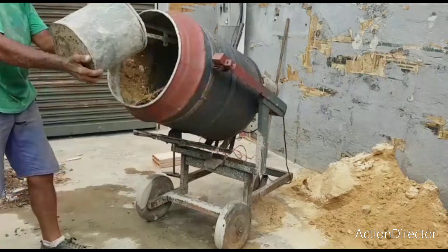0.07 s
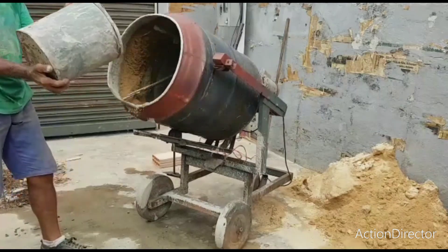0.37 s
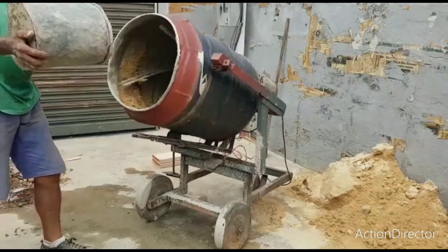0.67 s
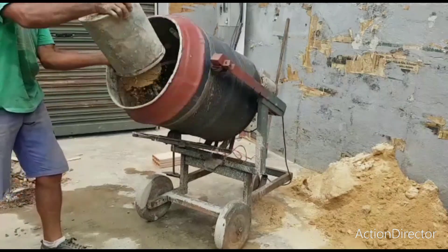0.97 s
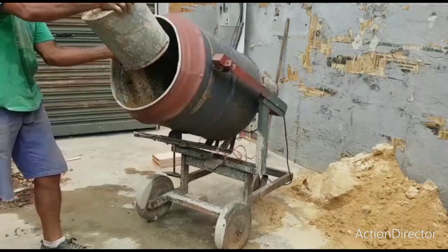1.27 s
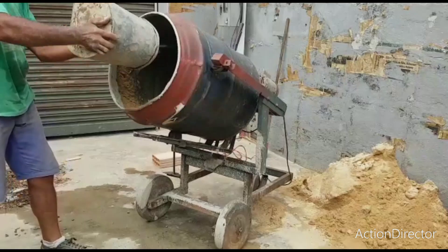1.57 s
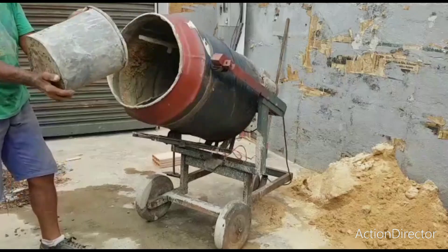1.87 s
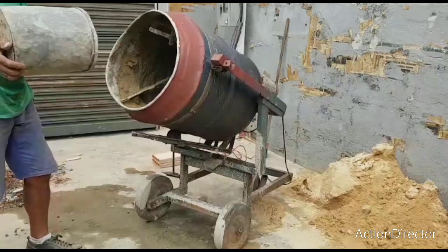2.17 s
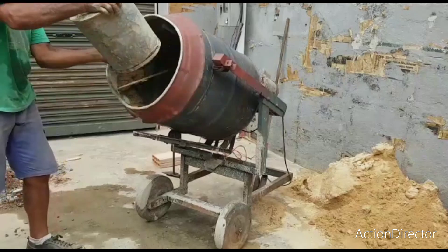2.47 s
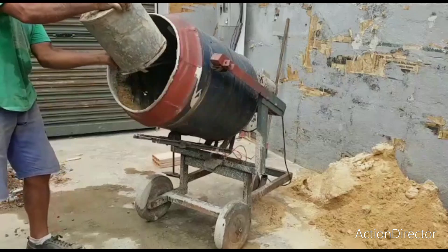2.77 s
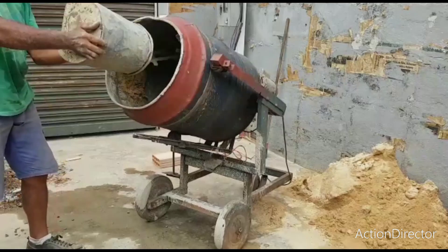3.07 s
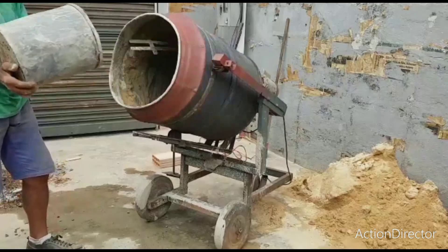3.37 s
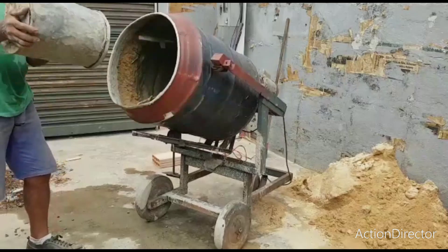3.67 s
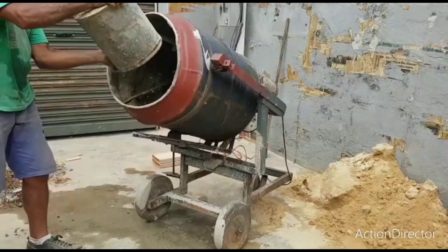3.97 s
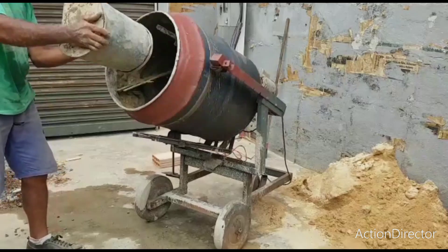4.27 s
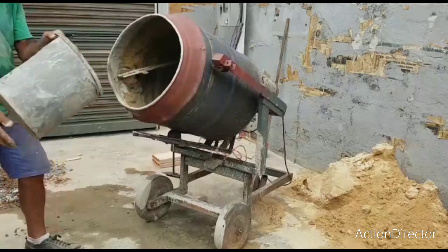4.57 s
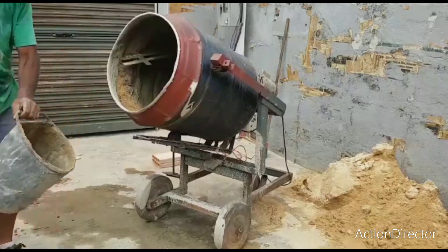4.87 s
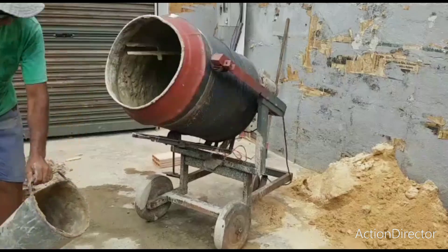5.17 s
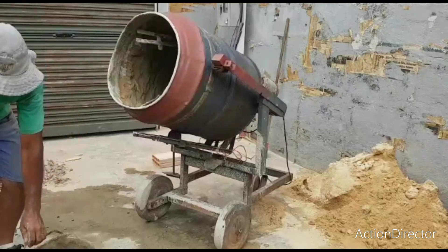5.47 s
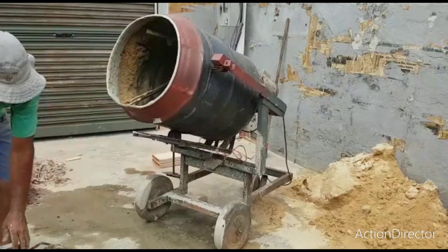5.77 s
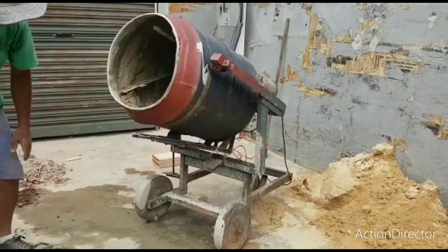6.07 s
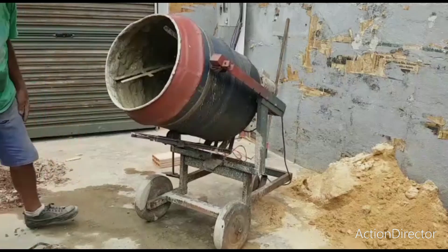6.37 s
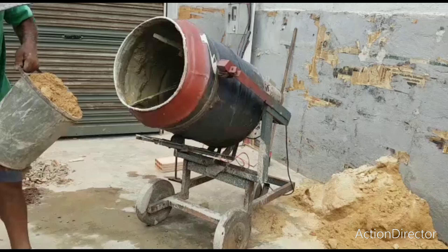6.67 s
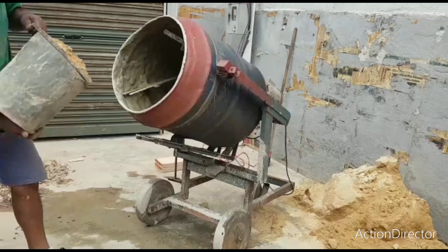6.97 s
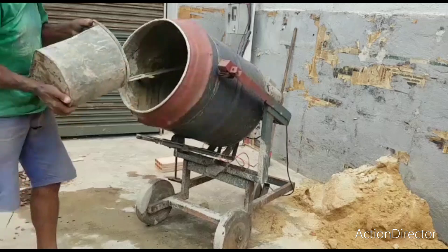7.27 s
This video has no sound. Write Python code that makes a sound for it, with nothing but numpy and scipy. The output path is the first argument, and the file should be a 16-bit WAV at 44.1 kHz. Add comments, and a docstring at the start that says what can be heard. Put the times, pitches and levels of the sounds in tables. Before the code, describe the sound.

A small electric concrete mixer hums and rumbles outdoors, rattling about once a second as sand slides inside and a bucket knocks against it.

```python
"""A small electric concrete mixer turns in a yard, its load swelling once a turn, about every second.
From the start the motor's hum beats against the booms of lumps slumping in the steel drum; the ring
gear rattles, damp sand slides and dry spots squeak by stick-slip friction. Near 1 s a plastic bucket
is knocked empty and the rim gives the first of its clanks. A far engine murmurs, loudest near 3 s.
Near 5.8 s the bucket is dropped on the ground, and at 6.75 s the sound stops abruptly."""
import sys
import numpy as np
from scipy import signal
from scipy.fft import rfft, irfft, next_fast_len
from scipy.io import wavfile
from scipy.ndimage import uniform_filter1d, map_coordinates

SR = 44100
rng = np.random.default_rng(int(sys.argv[2]) if len(sys.argv) > 2 else 0)


def waveform_to_disk(signal):
    """Save audio, clipped to [-1, 1], as 16-bit WAV at the path in sys.argv[1]."""
    frames = np.transpose(np.atleast_2d(signal))
    scaled = np.clip(frames, -1, 1) * 32767
    samples = np.round(scaled).astype(np.int16)
    wavfile.write(sys.argv[1], SR, samples)


N = 322812

# turns of the drum: (start t/s, deepest mode gain/dB, hum gain/dB, sand gain/dB, jolt level/dB)
DRUM_TURNS = [(-.223, 4, 0.5, -3, -26), (0.849, 0.5, -1, -0.6, -26.5), (1.929, 0.5, 1.5, -1.2, -24),
              (3.0, 1, -1, 0, -30), (4.078, 1.5, 1, -1.5, -22.5), (5.146, -1.5, 2, 1.5, -35),
              (6.215, 0, 0.5, -1, -25.5)]
# the motor's hum as it labours: (t/s into the turn, level/dB)
MOTOR_HUM = [(0, -26), (.08, -28.5), (.22, -34), (.35, -27.5), (.55, -31.5), (.79, -36.5), (.87, -35),
             (.98, -37), (1.07, -35)]
# the drum's deepest mode, strongest after the load drops: (t/s into the turn, level/dB)
DEEP_MODE = [(0, -32), (.05, -33), (.14, -27.5), (.25, -28.5), (.35, -40.5), (.47, -41), (.78, -37),
             (.9, -41.5), (1.05, -44)]
# heavy lumps slump and boom the drum: (peak t/s, level/dB, half length/s)
LUMP_SLUMPS = [(.068, -21, 0.051), (0.13, -25, 0.023), (0.643, -26, 0.038), (0.904, -27.5, .04),
               (.992, -20.5, 0.012), (1.078, -17, 0.032), (1.428, -23, 0.042), (1.974, -23, 0.026),
               (2.061, -26, .02), (2.24, -20.5, 0.084), (2.497, -28, 0.027), (2.854, -25, 0.063),
               (3.148, -25, 0.033), (3.276, -26, .024), (3.334, -17.5, 0.047), (3.824, -26.5, 0.041),
               (4.106, -22.5, 0.033), (4.234, -24, 0.033), (4.328, -22, 0.034), (4.418, -21.5, 0.06),
               (4.597, -20.5, 0.045), (4.674, -24, 0.057), (4.943, -27, 0.065), (5.198, -27, 0.035),
               (5.381, -18.5, 0.04), (5.462, -20.5, 0.026), (5.983, -22.5, 0.05), (6.232, -24.5, 0.024),
               (6.316, -25, .02), (6.402, -25, 0.034), (6.473, -23, 0.043), (6.57, -24.5, .027),
               (6.628, -25, .024)]
# higher, weaker modes of the loaded drum: (f/Hz, bandwidth/Hz, level/dB)
DRUM_MODES = [(99.6, 5.5, -1.5), (109.8, 7, -3), (128.9, 2.5, -1.5), (138.2, 2.1, -6.5), (167, 30, -15.5)]

def motor_and_drum(rattle_db):
    """Beating: hum at twice the mains frequency interferes with the drum's deep mode and booms."""
    t = np.arange(N) / SR
    mains_hz = 60 + .08 * wobble(3)
    hum_db = through_turn(MOTOR_HUM, gain_column=2)
    hum = amp(hum_db + 1.1 * wobble(5.4)) * tone(2 * mains_hz)
    hum_cycles = np.cumsum(2 * mains_hz) / SR
    deep_db = through_turn(DEEP_MODE, gain_column=1)
    deep = amp(deep_db - 1 + 1.1 * wobble(5.8)) * tone(hz=88.3 + 1.257 * wobble(8.8))
    booms = np.zeros(N)
    for s, db, length in LUMP_SLUMPS:
        near = slice(*np.searchsorted(t, [s - 4 * length, s + 4 * length]))
        age = t[near] - s
        boom_hz = rng.normal(103.4, 1.1)
        # at its loudest a boom is in phase with the hum; before and after, the two cancel and chug
        cycles = np.interp(s, t, hum_cycles) + boom_hz * age
        booms[near] += amp(db) * np.exp(-(age / length) ** 2) * np.sqrt(2) * np.sin(2 * np.pi * cycles)
    tumbling = resonate(rng.standard_normal((2, N)), DRUM_MODES)
    tumbling = coloured(tumbling, [(55, -26.5), (85, -10.5), (100, 6.5), (170, -4), (300, -7.5)])
    mid, side = steady(tumbling, seconds=.3)
    rumble_db = -34.5 + .73 * (rattle_db - rattle_db.mean())  # swells with the rattle
    rumble = amp(rumble_db) * (mid + amp(-15.5) * np.array([side, -side]))
    shaft = amp(-60) * tone(mains_hz / 2)
    return (hum + deep + booms + rumble) * amp([[-.35], [.35]]) + shaft


# the load drops and the blades lift it: (t/s into the turn, hold/s, rattle level/dB, sand level/dB)
LOAD_SURGES = [(0.01, 0.016, -33, -46), (0.107, 0.032, -35, -49), (0.163, 0.11, -39, -48.5),
               (0.246, .02, -47.5, -67), (0.313, 0.26, -44, -63), (0.4, .02, -50.5, -55),
               (0.605, 0.042, -63.5, -53), (0.858, 0.055, -43, -51.5), (0.98, 0.076, -51.5, -57.5)]
# loose sand slides off the bucket and the blades: (t/s, hold/s, level/dB)
SAND_SLIDES = [(.154, 0.028, -47), (.244, .07, -50), (1.405, 0.13, -53.5), (2.135, 0.033, -44.5),
               (2.555, 0.076, -52), (2.772, 0.027, -48.5), (3.195, 0.069, -45.5), (3.82, 0.1, -48.5),
               (4.29, .04, -46), (4.71, 0.032, -52), (4.993, 0.058, -47), (5.35, 0.03, -49),
               (5.55, .02, -60.5), (6.005, .02, -60), (6.1, 0.047, -48), (6.24, 0.015, -46),
               (6.49, 0.079, -54), (6.715, 0.019, -47.5)]

def load_levels():
    """Amplitude modulation: rattle and sand levels in dB surge every turn; stray slides add sand."""
    rattle, grit = [], list(SAND_SLIDES)
    for start, _, _, sand_gain_db, _ in DRUM_TURNS:
        for at, hold, rattle_db, sand_db in LOAD_SURGES:
            rattle.append((start + at, hold, rattle_db))
            grit.append((start + at, hold, sand_db + sand_gain_db))
    return (swells(rattle, idle_db=-40, attack_s=.033, release_s=.058) + .4 * wobble(22),
            swells(grit, idle_db=-59.5, attack_s=.035, release_s=.065) + .22 * wobble(16))


# spectrum of the clattering teeth: (f/Hz, level/dB)
TEETH_SPECTRUM = [(60, -29.5), (140, 0), (280, 1.5), (420, 0.5), (650, 0.5), (790, -7.5), (1000, -5.5),
                  (1600, -4.5), (2300, -9.5), (3300, -17.5), (5000, -30), (8000, -38.5), (15500, -37)]
# resonances of the steel wall: (f/Hz, bandwidth/Hz, level/dB)
WALL_MODES = [(203.4, 11.2, 2), (250, 2.9, -1.5), (338.3, 20, 2.5), (372, 21, 3), (516.6, 19, 1.5),
              (589, 28, 0), (670.6, 22, 1.5), (948, 110, -4), (1310, 34, -8.5), (5100, 74, -22.5)]

def gear(rattle_db):
    """Impact excitation: loose pinion teeth clatter on the ring gear and set the steel wall ringing."""
    swell = amp(rattle_db - rattle_db.mean())
    teeth = spread(impacts(rate=600, scatter_db=5) * swell, direct_db=-2.5)
    wall_blows = spread(impacts(rate=500, scatter_db=8.5) * swell, direct_db=-3)
    clatter = amp(3) * coloured(teeth, TEETH_SPECTRUM)
    ringing = amp(-.5) * resonate(wall_blows, WALL_MODES)
    return amp(rattle_db.mean()) * (clatter + ringing)


# spectrum of damp sand on steel: (f/Hz, level/dB)
SAND_SPECTRUM = [(300, -7.5), (900, -1), (1700, 2), (2600, -1.5), (3500, -6), (5000, -10), (6500, -12),
                 (8600, -14), (10000, -15), (11300, -13), (13500, -18), (15500, -24.5)]

def sand(sand_db):
    """Shot noise: grit lifted by the blades slides and patters down the wall in small clumps."""
    grit = impacts(rate=900, scatter_db=4) * amp(1.53 * wobble(45))
    return amp(sand_db + 10) * coloured(spread(grit, direct_db=-2.5), SAND_SPECTRUM)


# a blade scrapes once a turn: (t/s into the turn, f/Hz, half bandwidth/Hz, length/s)
BLADE_SCRAPE = (0.23, 1400, 270, 0.044)
# stray scrapes of steel and grit: (t/s, level/dB, f/Hz, half bandwidth/Hz, length/s)
STRAY_SCRAPES = [(0.264, -31, 1590, 600, 0.042), (0.367, -34, 1400, 400, 0.023),
                 (0.658, -27.5, 900, 349, 0.022), (1.901, -32.5, 2950, 745, 0.013),
                 (2.29, -31.5, 1600, 600, 0.032), (2.707, -29, 1032, 920, 0.027),
                 (3.53, -40, 3070, 400, .016), (4.686, -28.5, 715, 280, 0.044),
                 (4.723, -32.5, 1940, 550, 0.052), (5.814, -27, 1040, 499, 0.045),
                 (6.237, -33, 2030, 603, 0.073)]

def scrapes():
    """Sliding friction: a surface catches with a tick, then a burst of slips rings one band."""
    track, t = np.zeros(N), np.arange(SR // 4) / SR
    blade_db = -31.5
    blade = [(start + BLADE_SCRAPE[0], blade_db, *BLADE_SCRAPE[1:]) for start, *_ in DRUM_TURNS]
    for s, db, hz, width, length in blade + STRAY_SCRAPES:
        slips = rng.standard_normal(len(t)) * amp(2 * rng.standard_normal(len(t)))
        band = unit(filtered(slips, lambda f: 1 / (1 + np.abs((f - hz) / width) ** 1.6)))
        tick = np.sin(2 * np.pi * hz * t) * np.exp(-t * width)
        add(track, s, amp(db - 5) * (band * np.exp(-(t / length) ** 2) + .8 * tick))
    return spread(track, direct_db=2.5)


# hard steel contacts with the rim and their quick rebounds: (t/s, level/dB)
RIM_STRIKES = [(.742, -27.5), (0.752, -31.5), (.759, -28.5), (0.77, -36.5), (2.897, -28), (2.907, -30),
               (2.917, -35.5), (2.93, -35.5), (3.952, -27.5), (3.96, -31), (6.107, -35), (6.118, -35.5)]
# resonances of the rim: (f/Hz, level/dB, T60/s)
RIM_MODES = [(1510, -10.5, .06), (1717, -1.5, 0.054), (1940, 2.5, 0.08), (2150, -8, 0.042),
             (2314, -3.5, .08), (2540, -3.5, .07), (3105, -13.5, .08), (3460, -10.5, 0.081)]
# spectrum of one contact: (f/Hz, level/dB)
CRACK_SPECTRUM = [(400, -14), (1200, 0.5), (1800, 5), (2600, 2.5), (3400, -17), (5000, -18), (12000, -30.5)]

def rim_clanks():
    """Free vibration: each contact gives a hard crack and rings the rim's modes in a new balance."""
    track, t = np.zeros(N), np.arange(SR // 4) / SR
    for s, db in RIM_STRIKES:
        ring = np.zeros(len(t))
        for hz, level, t60 in RIM_MODES:
            envelope = amp(rng.normal(level, 1.5)) * decay(t, t60)
            cycles = hz * rng.normal(1, .005) * t + rng.random()
            ring += envelope * np.sin(2 * np.pi * cycles)
        crack = coloured(rng.standard_normal(len(t)), CRACK_SPECTRUM) * decay(t, t60=.056)
        add(track, s, amp(db) * (amp(-7) * ring + amp(2) * crack))
    return spread(track, direct_db=4.5)


# dry spots squeak: (t/s, level/dB, f/Hz, rise/(Hz/s), length/s, jitter/Hz)
DRY_SPOTS = [(0.359, -41.5, 2770, 300, .04, 140), (1.456, -38.5, 2605, 2560, 0.067, 170),
             (2.527, -43, 2550, 3480, .04, 160), (3.607, -40, 2460, 7090, 0.045, 54.2),
             (4.931, -40, 2840, 1510, 0.037, 160)]

def squeaks():
    """Stick-slip oscillation: a dry spot gives a short, rising tone whose pitch and level flutter."""
    track, t = np.zeros(N), np.arange(SR // 4) / SR
    flutter_hz = 250
    for s, db, hz, rise, length, jitter_hz in DRY_SPOTS:
        noise = rng.standard_normal((2, len(t)))
        jitter, flutter = unit(filtered(noise, lambda f: 1 / (1 + (f / flutter_hz) ** 2)))
        envelope = (1 - np.exp(-t / .0047)) * np.exp(-(t / length) ** 2) * unit(amp(2.1 * flutter))
        add(track, s, amp(db) * envelope * tone(hz + rise * t + jitter_hz * jitter))
    return spread(track, direct_db=4)


# clumps of flying grit hit steel: (t/s, level/dB)
GRIT_HITS = [(.983, -41), (1.952, -44), (2.095, -35), (2.984, -36), (3.023, -41), (3.868, -37.5),
             (4.289, -34), (4.845, -35), (5.098, -40), (5.753, -34.5), (6.333, -40)]
# spectrum of their spatter: (f/Hz, level/dB)
SPATTER_SPECTRUM = [(600, -13), (2500, 6), (4500, 6), (8500, -11), (12000, 1), (15500, -8)]

def grit_spatters():
    """Broadband transients: flying grit lands in bright, fast-decaying bursts of noise."""
    track, t = np.zeros(N), np.arange(SR // 4) / SR
    for s, db in GRIT_HITS:
        add(track, s, amp(db - 3) * decay(t, t60=.07) * rng.standard_normal(len(t)))
    return spread(filtered(track, lambda f: amp(along(SPATTER_SPECTRUM, f))), direct_db=-1)


# bucket knocks and sand landing, hard blows brighter: (t/s, level/dB, clack gain/dB, tilt/(dB/octave))
BLOWS = [(.735, -19, -10.5, 0), (.892, -27, -13, 10), (1.068, -10.5, -18, -1.5), (4.59, -22.5, -24, 2),
         (5.754, -18, 1.5, 9), (5.766, -13, -16, 1), (5.797, -13, -22, 2.5), (5.813, -17.5, -7, -2.5),
         (5.825, -22, -2, 7), (5.837, -8.5, -14, -3.5), (5.942, -18, -22, 1.5)]
# resonances of the plastic bucket: (f/Hz, level/dB, T60/s)
BUCKET_MODES = [(162.5, -7, .1), (206, -0.5, 0.13), (252.2, 5, .21), (285, -4.5, 0.083), (333.7, -4, .18),
                (368, -9.5, 0.12), (508, -15, 0.16)]

def knocks():
    """Damped modes: the bucket, falling sand and the dropping load thud, each with a gritty clack."""
    thuds, clacks, t = np.zeros(N), np.zeros(N), np.arange(SR // 2) / SR
    # once a turn the gear jolts as the load drops
    jolts = [(start + .019, jolt_db, 3, 0) for start, *_, jolt_db in DRUM_TURNS]
    for s, db, clack_db, tilt_db in jolts + BLOWS:
        ring = np.zeros(len(t))
        for hz, level, t60 in BUCKET_MODES:
            # the grip and the sand inside change the modes from blow to blow
            cycles = hz * rng.normal(1, .018) * t
            mode_db = rng.normal(level, .5) + tilt_db * np.log2(hz / BUCKET_MODES[0][0])
            ring += amp(mode_db) * decay(t, t60) * np.sin(2 * np.pi * cycles)
        ring *= 1 - np.exp(-t / .0012)
        add(thuds, s, amp(db - 23.5) * unit(ring))
        clack = (1 - np.exp(-t / .0015)) * decay(t, t60=.08) * rng.standard_normal(len(t))
        add(clacks, s, amp(db + clack_db + 1.5) * clack)
    # a band-pass dulls the clacks
    clacks = filtered(clacks,
                      lambda f: 1j * f / (150 + 1j * f) / (1 + 1j * f / 1200) / (1 + 1j * f / 2500))
    return spread(thuds + clacks, direct_db=5) * amp([[-1], [1]])


# reverberation of drum and yard: (f/Hz, T60/s)
REVERB_TIMES = [(100, 0.28), (500, 0.14), (2500, 0.16), (12000, 0.12)]
# stereo width: (f/Hz, side minus mid level/dB)
STEREO_WIDTH = [(60, -2.5), (200, -16.5), (380, -10), (700, -3.5), (1300, 0), (2400, -3), (4400, 2.5),
                (8100, -5.5), (15000, 1)]

def spread(x, direct_db):
    """Reverberation: direct sound plus a short diffuse tail that changes as the drum turns."""
    hop, onset = SR // 12, SR // 1000
    window = np.sin(np.pi * np.arange(2 * hop) / (2 * hop))
    pieces = np.lib.stride_tricks.sliding_window_view(np.pad(x, (hop, 2 * hop)), 2 * hop)[::hop] * window
    hz, t, noise = signal.stft(rng.standard_normal((2, len(pieces), SR // 7)), SR, nperseg=256)
    tails = signal.istft(noise * decay(t, along(REVERB_TIMES, hz)[:, None]), SR, nperseg=256)[1]
    tails /= np.linalg.norm(tails, axis=-1, keepdims=True)
    # the first millisecond of each contact already differs between the ears
    tails[1, :, :onset] += amp(direct_db) * rng.standard_normal((len(pieces), onset)) / np.sqrt(onset)
    rings = signal.fftconvolve(pieces[None], tails, axes=-1)
    mid, side = np.zeros((2, N + hop))
    for k in range(len(pieces)):
        add(mid, k * hop / SR, rings[0, k])
        add(side, k * hop / SR, rings[1, k])
    mid = mid[hop:] + amp(direct_db) * x
    side = filtered(side[hop:], lambda f: amp(along(STEREO_WIDTH, f)))
    return np.array([mid + side, mid - side]) / np.hypot(1, amp(direct_db))


# the far engine changing speed: (t/s, firing f/Hz, level/dB)
FAR_ENGINE = [(0, 42, -53.5), (1.8, 43, -62), (2.15, 45.5, -48), (2.6, 53.1, -49), (3.1, 43.8, -42),
              (3.85, 38.2, -53), (4.15, 41.9, -46.5), (4.95, 47.7, -46), (5.25, 55, -49),
              (5.6, 53.4, -76.5)]
# spectrum of the open air: (f/Hz, level/dB)
AIR_SPECTRUM = [(20, -15.5), (32, -3), (60, -5.5), (200, -4), (1000, -10.5), (3000, -25.5), (8000, -39),
                (11500, -34), (15500, -38)]

def yard():
    """Ambient noise: open air, and a far engine radiating a tone at its firing frequency."""
    times, *columns = np.transpose(FAR_ENGINE)
    firing_hz, db = [np.interp(np.arange(N) / SR, times, column) for column in columns]
    air = coloured(rng.standard_normal(N) + .32 * rng.standard_normal((2, N)), AIR_SPECTRUM)
    return amp(db + wobble(6.3)) * tone(firing_hz) + amp(-39) * air


def through_turn(rows, gain_column):
    """A smoothed periodic level in dB, shifted by each turn's own gain."""
    t, turns = np.arange(N) / SR, np.array(DRUM_TURNS)
    turn = np.searchsorted(turns[:, 0], t) - 1
    db = np.interp(t - turns[turn, 0], *np.transpose(rows)) + turns[turn, gain_column]
    return uniform_filter1d(db, SR // 40)


def swells(rows, idle_db, attack_s, release_s):
    """Power summation: the level in dB of (t/s, hold/s, level/dB) swells over an idle level."""
    t, power = np.arange(N) / SR, np.full(N, amp(idle_db) ** 2)
    for s, hold, db in rows:
        near = slice(*np.searchsorted(t, [s - attack_s, s + hold + 10 * release_s]))
        age = t[near] - s
        rise = np.clip(age / attack_s + .5, 0, 1)
        fall = np.exp(-np.maximum(age - hold, 0) / release_s)
        power[near] += (amp(db) * rise * fall) ** 2
    return 10 * np.log10(power)


def impacts(rate, scatter_db):
    """A Poisson process: rate contacts a second on average, of log-normal size."""
    pulses = (rng.random(N) < rate / SR) * rng.choice([-1, 1], N)
    return unit(pulses * amp(scatter_db * np.clip(rng.standard_normal(N), -2, 2)))


def resonate(x, modes):
    """Modal superposition: x through (f/Hz, bandwidth/Hz, level/dB) resonances, at rms 1."""
    return unit(filtered(x, lambda f: sum(
        (-1) ** k * amp(db) * 1j * f * width / (hz * hz - f * f + 1j * f * width)
        for k, (hz, width, db) in enumerate(modes))))


def coloured(x, spectrum):
    """x shaped by a (f/Hz, level/dB) spectrum, at rms 1."""
    return unit(filtered(x, lambda hz: amp(along(spectrum, hz))))


def filtered(x, response):
    """x through a frequency response."""
    n = x.shape[-1]
    padded = next_fast_len(n + SR // 2)
    return irfft(rfft(x, padded) * response(np.fft.rfftfreq(padded, 1 / SR)), padded)[..., :n]


def steady(x, seconds):
    """x divided by its running rms, which evens out slow swells."""
    size = int(seconds * SR / 2)
    power = uniform_filter1d(uniform_filter1d(x * x, size), size)
    return x / np.sqrt(np.abs(power) + 1e-6)


def along(points, hz):
    """(f/Hz, value) points read on a log frequency axis."""
    f, values = np.transpose(points)
    return np.interp(np.log(hz + 1), np.log(f + 1), values)


def wobble(rate):
    """A smooth random curve, rate knots a second."""
    return map_coordinates(rng.standard_normal(int(N * rate / SR) + 4), [np.arange(N) * rate / SR])


def tone(hz):
    """A sine of rms 1 on a frequency curve."""
    return np.sqrt(2) * np.sin(2 * np.pi * np.cumsum(hz) / SR)


def decay(t, t60):
    """Exponential decay, 60 dB in t60 seconds."""
    return amp(-60 * t / t60)


def amp(db):
    """Decibels to gain."""
    return 10 ** (np.asarray(db) / 20)


def unit(x):
    """x scaled to rms 1."""
    return x / np.sqrt(np.mean(x ** 2) + 1e-20)


def add(track, s, sound):
    """Mix a sound in at time s; one that starts before time zero is left out."""
    if s >= 0:
        part = track[round(s * SR):][:len(sound)]
        part += sound[:len(part)]


def scene():
    """Superposition: the mixer, a little to the left, with the knocks and the yard."""
    rattle_db, sand_db = load_levels()
    steel = gear(rattle_db) + sand(sand_db) + scrapes() + rim_clanks() + squeaks() + grit_spatters()
    left, right = steel * amp([[.5], [-.5]]) + motor_and_drum(rattle_db)
    mixer = np.array([left, np.roll(right, 2)])  # its sound reaches the left ear slightly sooner
    return mixer + knocks() + yard()


def record(dry):
    """Gating and band limiting: the sound stops abruptly and the highest treble is cut."""
    end_s, top_hz = 6.75, 15680
    fade = np.clip((end_s - np.arange(N) / SR) / .012, 0, 1)
    return filtered(dry * fade, lambda hz: np.clip((top_hz - hz) / 150, 0, 1))


dry = scene()
out = record(dry)
waveform_to_disk(out)
```